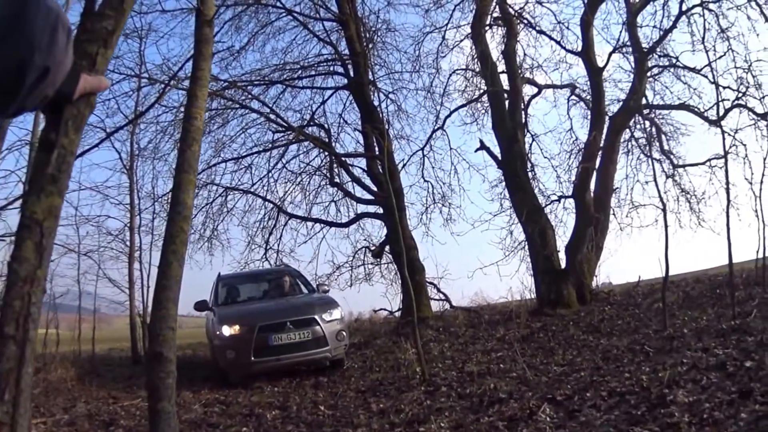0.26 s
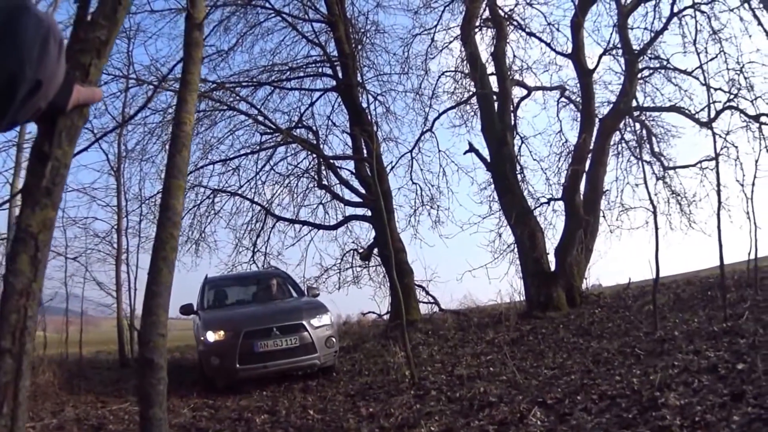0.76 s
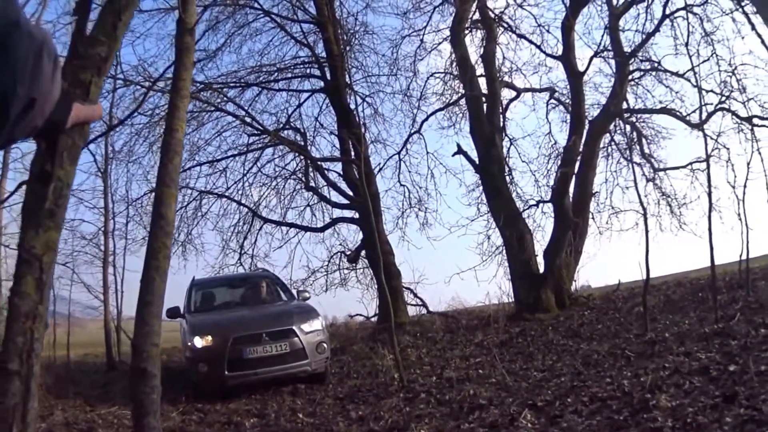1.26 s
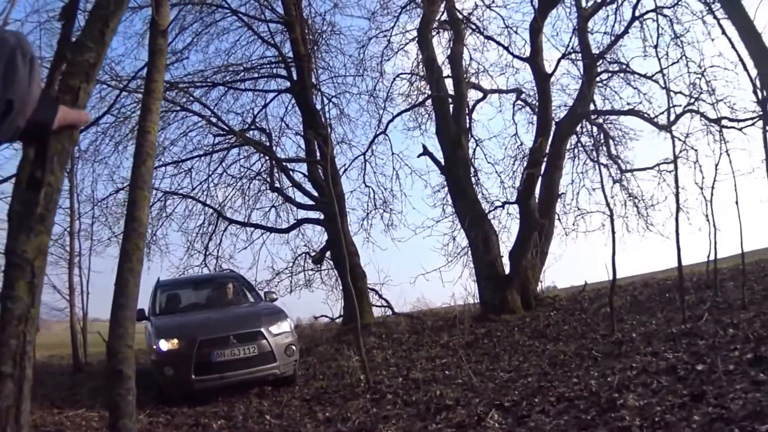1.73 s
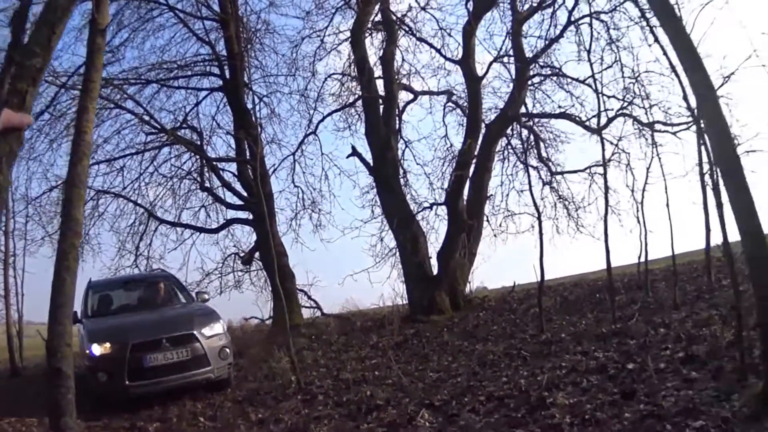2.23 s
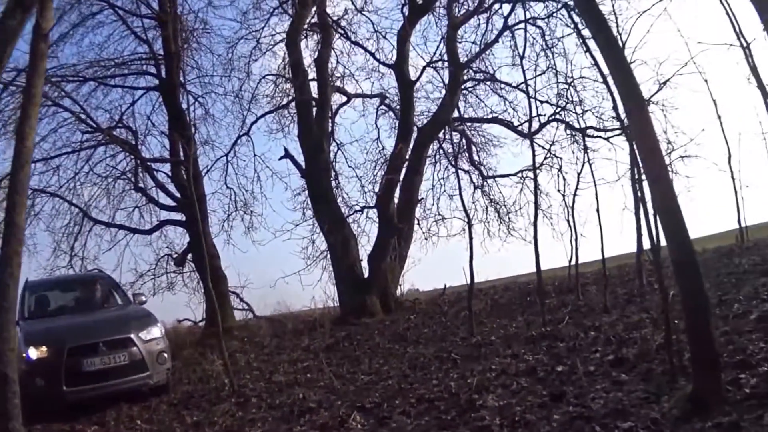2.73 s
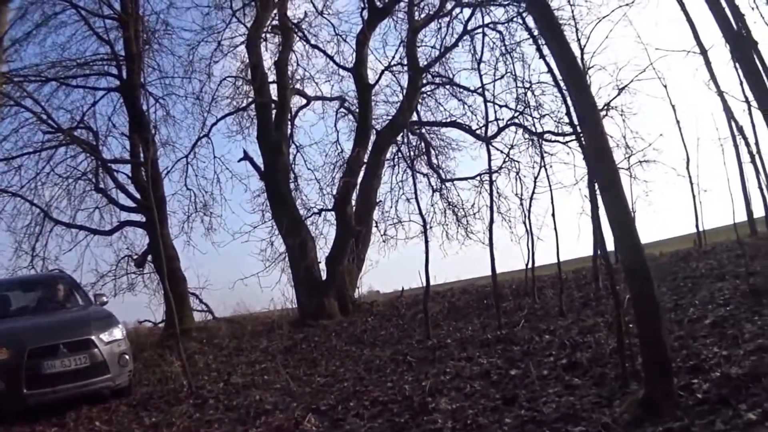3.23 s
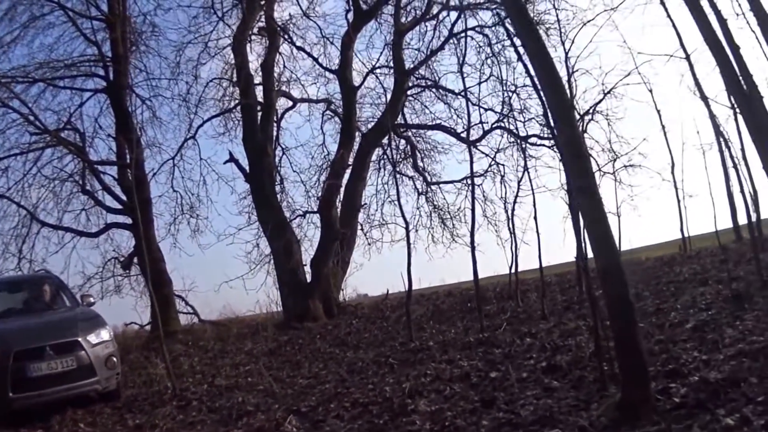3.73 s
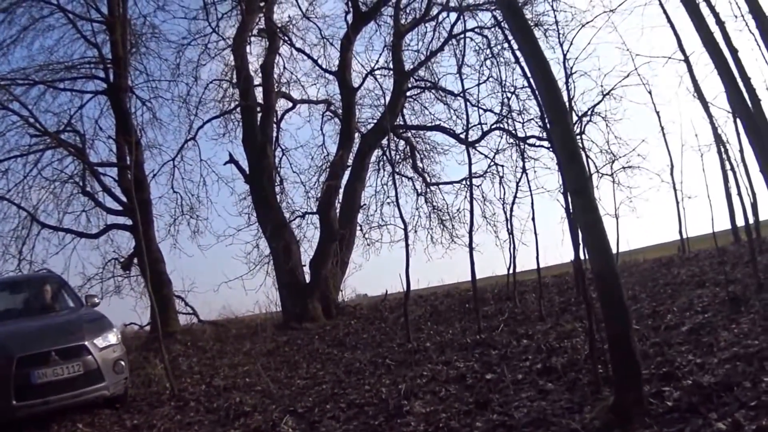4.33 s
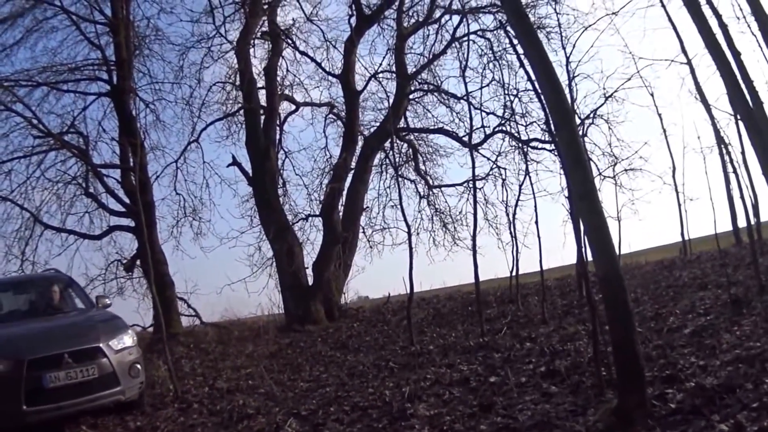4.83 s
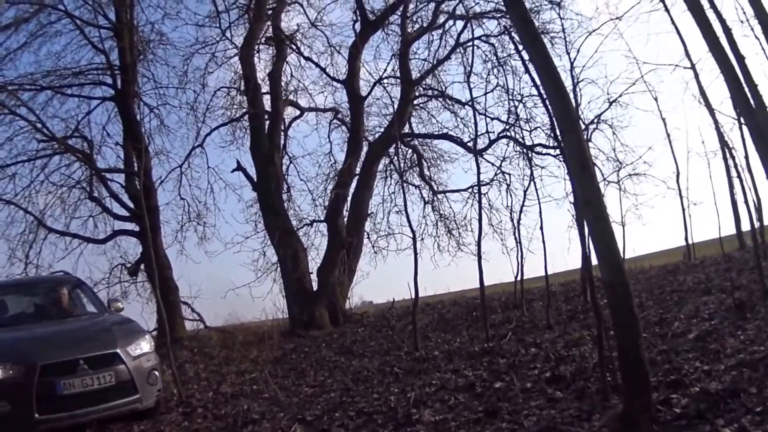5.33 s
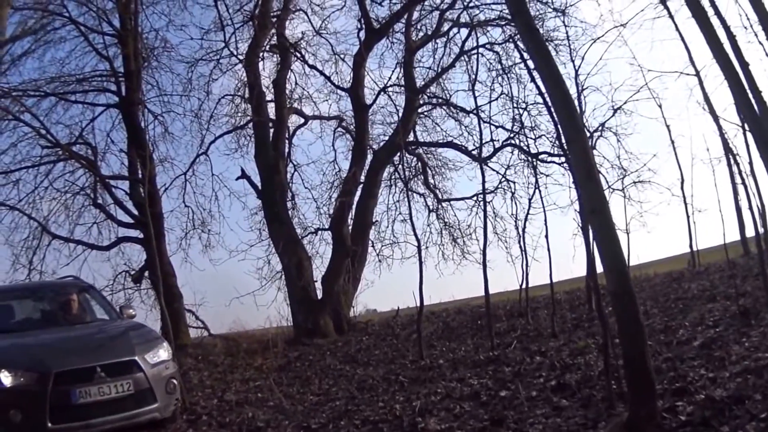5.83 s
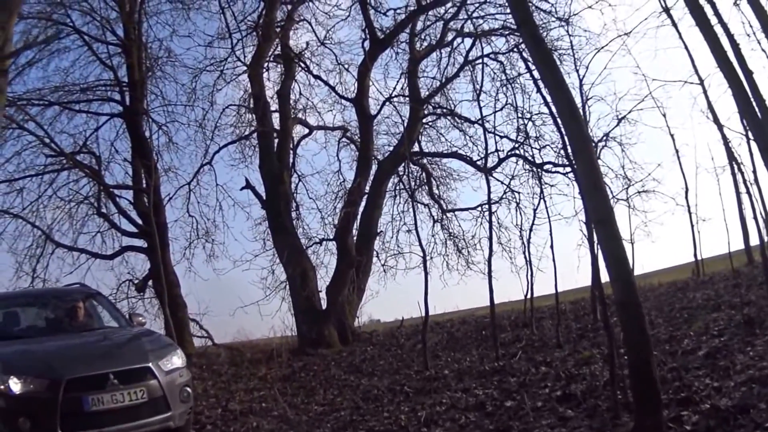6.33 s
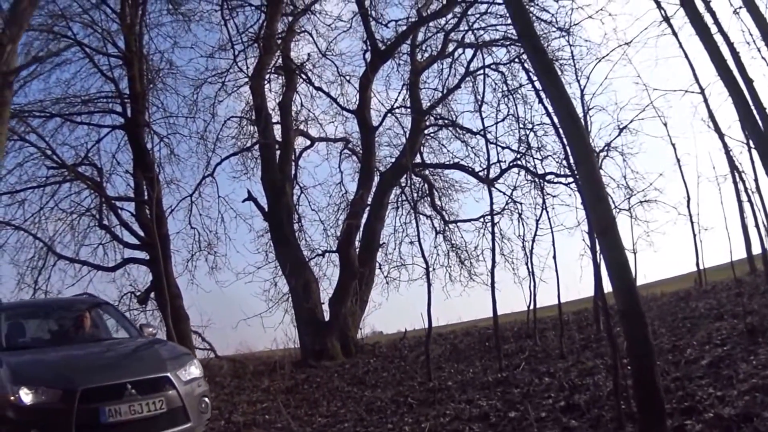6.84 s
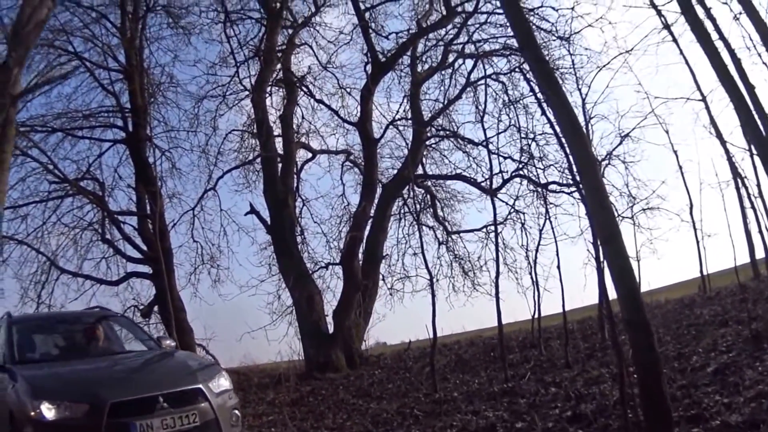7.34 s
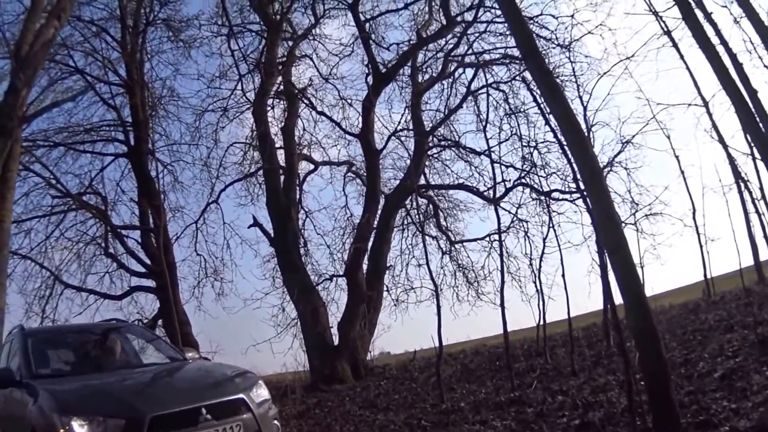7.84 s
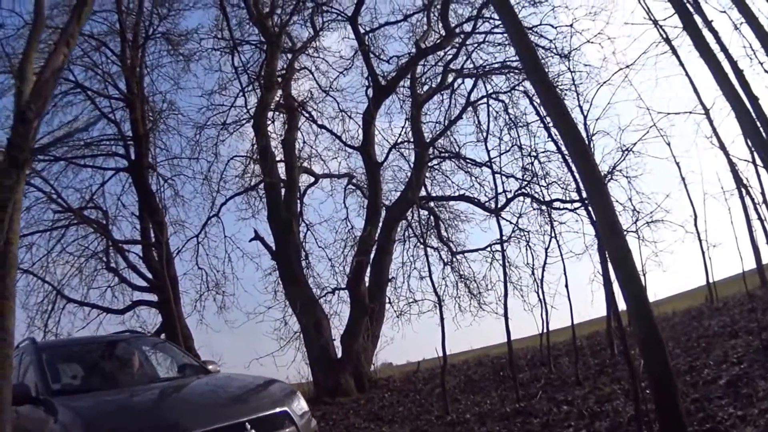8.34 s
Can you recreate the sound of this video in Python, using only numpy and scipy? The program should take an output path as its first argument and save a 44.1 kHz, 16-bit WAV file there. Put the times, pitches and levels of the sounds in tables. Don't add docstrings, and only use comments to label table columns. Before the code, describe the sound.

In open woodland, a small hand-held stereo camera hears a diesel off-road car creeping closer. From 0 s the engine clatters and hums, slowing slightly towards 1 s, while tyres crackle continuously over dry leaves and twigs snap irregularly. At about 0.6 s a thick stick breaks sharply. Around 0.6 to 1.9 s a sleeve brushes roughly on bark, with soft low finger bumps and small wooden knocks. At 1.57 s a branch hits the underbody, a dull, briefly ringing thump with a short scrape. The engine picks up from 2 s, peaking near 3.2 s with a deep leaf crunch, then eases. Scattered snaps and handling thuds follow, clustered around 4 s. It revs again at 6.2 s, then slows to a knocking idle-like crawl by 7.75 s. Leaf crunching thickens after 7 s, and very loud twig cracks burst at 8.1 s before engine and leaves continue to 8.6 s.

```python
import sys
import numpy as np
from scipy import signal
from scipy.fft import rfft, irfft, next_fast_len
from scipy.io import wavfile

SR = 44100
rng = np.random.default_rng(int(sys.argv[2]) if len(sys.argv) > 2 else 0)


def dump(signal):
    limited = np.clip(np.atleast_2d(signal).T, -1, 1)
    pcm = np.round(limited * 32767).astype(np.int16)
    wavfile.write(sys.argv[1], SR, pcm)


def field_ratio(decibels):
    return 10 ** (np.asarray(decibels, dtype=float) / 20)


N = 378378

# time in seconds, firings per second.
FIRING_RATE = [(0.0, 30.5), (1.0, 24.8), (1.7, 25.6), (2.25, 33.3), (2.8, 33.8), (3.09, 40.6), (3.27, 41.2),
               (3.54, 37.8), (4.08, 33.6), (4.5, 35.35), (5.83, 30.6), (6.17, 39.6), (6.32, 39.4),
               (6.55, 35.9), (7.3, 29.9), (7.75, 24.4), (8.0, 25.5), (8.58, 26.0)]
# time in seconds, level in dB.
ENGINE_LOAD = [(0.0, -44.5), (1.6, -46), (1.77, -43), (2.39, -42.5), (2.82, -39.5), (3.32, -34),
               (3.61, -36.5), (5.52, -40.5), (5.95, -37.5), (6.09, -34.5), (6.88, -36), (7.12, -38),
               (8.58, -39.5)]
# frequency in Hz, level in dB per Hz.
CLATTER_SPECTRUM = [(700, -36.5), (1100, -25.5), (1500, -11), (2000, 1), (2600, -4), (3500, -3.5),
                    (6000, -9), (11000, -17)]
# frequency in Hz, width in Hz, gain in dB.
BLOCK_RESONANCES = [(1239, 184, 15.5), (1817, 89, 9.5), (2277, 360, 6), (2600, 50, 0)]
# frequency in Hz, level in dB per Hz.
RUMBLE_SPECTRUM = [(20, -7), (32, -8), (59, -8), (113, -7), (200, -6.5), (330, -3.5), (450, -11),
                   (900, -23.5)]
# frequency in Hz, level in dB per Hz.
DRONE_SPECTRUM = [(250, -27), (400, -7.5), (560, -7), (940, -10), (1100, -1.5), (1430, -5), (2400, -64)]
# multiple of the firing rate, level in dB.
HUM_PARTIALS = [(1, -74.5), (2, -68.5), (3, -69), (4, -69), (5, -71), (6, -68.5), (7, -74.5), (8, -71),
                (9, -73.5), (10, -71.5), (11, -82), (12, -78), (13, -78)]
# frequency in Hz, width in Hz, gain in dB.
TAILPIPE_RESONANCES = [(41.1, 11, 15.5), (52, 8.5, 6), (78.6, 7.3, 6.5), (120, 17, 1.5), (235.6, 23, 6.5),
                       (293, 14, 2), (459, 23, 9.5)]
# frequency in Hz, width in Hz, gain in dB.
PIPE_RESONANCES = [(239, 16, 9.5), (308, 130, 3.5), (466.3, 42, 16), (659, 160, 6.5)]
# frequency in Hz, width in Hz, level in dB.
PIPE_BOOMS = [(240.3, 9.6, -72), (299.4, 11, -74.5), (470.4, 16, -69), (629, 22, -71), (660, 4.9, -75)]
# time in seconds, level in dB.
ROLLING = [(0.0, -45.5), (0.48, -49), (1.05, -45), (1.36, -48.5), (1.72, -50.5), (1.98, -48), (2.89, -48),
           (3.1, -47.5), (3.6, -47), (4.59, -46), (5.61, -45), (6.09, -48), (6.8, -44.5), (7.2, -45),
           (7.65, -45), (8.05, -43.5), (8.36, -44.5), (8.58, -44.5)]
# time in seconds, half length in seconds, extra level in dB.
LEAF_SURGES = [
    (0.646, 0.065, 1.5),
    (3.312, 0.12, 4),
    (4.375, .1, 1.5),
    (5.022, .1, 1.5),
    (5.645, 0.075, 1),
    (7.014, 0.058, 1.5),
    (7.365, 0.055, 4),
    (7.78, 0.031, 0.5),
    (8.058, .14, 2.5),
]
# frequency in Hz, level in dB per Hz.
CRUSH_SPECTRUM = [(900, -39), (1600, -3), (2500, -2), (4000, -1.5), (6000, 1), (8500, 0.5), (11000, -0.5)]
# start in seconds, peak in dB, brittleness in dB, pitch in Hz.
TWIG_SNAPS = [(0.0445, -19.5, -8, 3630), (0.0907, -21.5, -20, 3750), (0.2685, -21, -14.5, 5390),
              (0.5428, -20, -13, 5360), (0.591, -26, -14, 7000), (0.684, -17, -19, 5470),
              (0.7897, -22, -27, 4650), (0.819, -23, -21, 4590), (0.8944, -28, -16, 3670),
              (0.9393, -25, -20, 5260), (1.004, -24, -35, 4440), (1.0535, -27, -18, 5260),
              (1.0976, -23, -14, 5020), (1.2974, -27, -22, 6050), (1.516, -22, -8, 6400),
              (1.5377, -23, -12, 5430), (1.5728, -25, -14, 5500), (1.6216, -25, -32, 6010),
              (2.362, -29, -27, 4940), (2.392, -24, -24, 6050), (3.121, -23, -26, 5150),
              (3.315, -22, -51, 6200), (3.386, -20, -8, 5200), (3.4895, -27, -25, 4050),
              (3.521, -23.5, -26, 4140), (3.6476, -21, -8, 6360), (3.7304, -26, -25, 4160),
              (4.0118, -37, -32, 3300), (4.181, -20.5, -26, 5060), (4.4625, -23, -25, 6200),
              (4.6523, -22, -27, 3910), (4.9645, -19, -10, 4180), (5.1447, -25, -25, 5040),
              (5.3697, -24.5, -14, 5150), (5.462, -24, -20, 4920), (5.6171, -21.5, -14, 5000),
              (5.945, -27, -21, 6060), (7.1546, -24, -20, 4270), (7.315, -17, -10, 4120),
              (7.4725, -21, -12, 5220), (7.5012, -21, -22, 4600), (7.64, -23, -30, 6200),
              (7.722, -19, -11, 4930), (7.7697, -24, -32.5, 4320), (7.7947, -21, -13, 5250),
              (7.8057, -23, -17, 5140), (7.9885, -19, -17, 4250), (8.111, -17.5, -17, 5500),
              (8.1344, -4.5, -16, 5400), (8.186, -9, -14, 7200)]
# start in seconds, peak in dB, pitch in Hz.
STEM_CRACKS = [(0.167, -30, 3730), (1.4979, -29, 5220), (1.694, -34, 5280), (2.8029, -32, 5150),
               (3.0744, -34, 4290), (3.0914, -33, 6050), (3.2194, -31, 4020), (3.2464, -28, 3560),
               (3.2754, -29, 5010), (3.2974, -26, 4180), (3.3494, -28, 4180), (3.4194, -29, 4160),
               (4.1668, -26, 4060), (5.0, -27, 5270), (5.5029, -31, 5310), (6.0596, -32, 4910),
               (6.9594, -26, 4200), (7.0294, -25, 5120), (7.0694, -32, 5040), (7.3354, -25, 5990),
               (7.3694, -22, 4160), (7.3944, -25, 6250), (7.6001, -30, 6130), (7.7493, -24, 4270),
               (7.9294, -26, 5120), (8.0004, -23, 5140), (8.0444, -24, 5210), (8.0904, -20, 6050),
               (8.1164, -25, 7010), (8.1204, -12, 5290), (8.1454, -21, 10500), (8.1994, -22, 5140),
               (8.2444, -26, 5320)]
# time in seconds, peak in dB, pitch in Hz.
HAND_THUDS = [(0.544, -44, 139), (0.736, -38.5, 120), (1.099, -39, 128), (1.152, -46, 115),
              (1.2, -40.5, 128), (1.239, -52, 125), (1.289, -48, 132), (1.395, -49, 74), (1.44, -40, 123),
              (1.488, -44, 124), (1.515, -40, 111), (1.55, -43, 185), (1.823, -45.5, 144), (1.98, -43, 172),
              (2.004, -43, 105), (2.061, -46, 136), (2.128, -46.2, 167), (2.148, -42.5, 133),
              (2.281, -42, 151), (2.503, -45, 187), (2.766, -42.5, 167), (3.784, -36, 158),
              (3.909, -42.5, 186), (4.005, -41, 119), (4.034, -52, 145), (4.054, -42, 182),
              (4.112, -35.5, 127), (4.184, -45, 173), (4.207, -39, 136), (4.247, -44, 123),
              (4.447, -44, 154), (4.797, -42.5, 120), (4.832, -41.5, 133), (4.87, -68, 171),
              (5.112, -45, 133), (5.192, -40, 107), (5.987, -43, 186), (6.501, -42, 116), (6.533, -37, 132),
              (6.551, -40.5, 138), (6.573, -45.2, 143), (6.596, -47, 88), (6.619, -56, 161),
              (6.929, -37, 141), (7.391, -40.5, 165), (7.633, -41, 143), (7.693, -42, 121),
              (7.791, -41, 143), (7.824, -40, 132), (7.875, -41, 187), (7.904, -48, 154), (8.024, -44, 133),
              (8.056, -42, 111), (8.142, -47, 97), (8.191, -42, 122), (8.216, -44, 129), (8.254, -45, 134),
              (8.409, -46, 109)]
# frequency in Hz, width in Hz, level in dB.
STICK_RESONANCES = [(2020, 620, -3), (3100, 700, -12), (4570, 660, 5), (5400, 500, -2), (7030, 640, 0),
                    (8300, 1100, 3), (10200, 550, 1.5)]
# start in seconds, peak in dB, tick in dB.
WOOD_KNOCKS = [(.766, -35, -17), (1.004, -31.5, -3), (1.217, -37, -27), (1.5386, -50, 15.5),
               (1.574, -54, 19), (1.6243, -49, 11), (1.73, -51, 4), (7.638, -54, 15.5), (8.051, -35, -14),
               (3.907, -31, 0), (7.875, -30.5, -9)]
# frequency in Hz, level in dB, time to fall 60 dB in seconds.
UNDERBODY_RINGING = [(207, -4, 0.58), (237.6, 4, 0.37), (317, 5, 0.32), (360, 17.5, 0.053),
                     (410, 1.5, 0.82), (460, 9.5, 0.089), (489, 4, 0.19), (563, 4, 0.2), (640, -1, 0.23),
                     (700, -22, 0.27)]
# time in seconds, left minus right in dB, plus 1.5 dB.
CAR_PAN = [(0.0, 0.5), (1.55, 0), (2.41, 1.5), (4.35, 2), (5.14, 1.5), (6.76, 2), (8.1, 1), (8.58, 1)]
# frequency in Hz, width in Hz, gain in dB.
LEFT_HOUSING = [(2350, 500, 3), (3400, 370, -5.8), (3820, 180, -5.1), (4520, 550, -4.2), (5520, 470, -9.7),
                (6500, 380, -9.9), (7940, 600, -12.7), (9600, 970, -13.2)]
# frequency in Hz, width in Hz, gain in dB.
RIGHT_HOUSING = [(3320, 630, -6.0), (3910, 120, -2.8), (4490, 390, -7.9), (5930, 750, -3.8),
                 (7670, 800, -12.0), (8870, 590, -6.9), (9540, 690, -10.9)]
# frequency in Hz, width in Hz, gain in dB.
SHARED_CAVITY = [(3450, 200, -1.2), (4150, 150, 2.2), (4820, 220, -1.2), (5180, 200, .8), (5720, 260, -1.4),
                 (6030, 200, 1.8), (6670, 320, -3.5)]
# frequency in Hz, gain in dB.
TREBLE_CUT = [(10990, 0), (11040, -27), (11300, -47), (12000, -65), (13000, -80)]

TIME = np.arange(N) / SR


def rms_one(x):
    return x / np.sqrt(np.mean(x ** 2) + 1e-20)


def peak_one(x):
    return x / np.abs(x).max()


def in_time(rows):
    s, value = np.transpose(rows)
    return np.interp(TIME, s, value)


def drift(rate):
    r = np.exp(-80 * np.pi * rate / SR)
    slow = signal.lfilter([1], [1, -2 * r, r * r], rng.standard_normal(N // 40 + 2002))[2000:]
    return np.interp(np.arange(N) / 40, np.arange(len(slow)), rms_one(slow))


def colour(x, points):
    point_hz, point_db = np.transpose(points)
    hz = np.maximum(np.arange(2049) * SR / 4096, 1)
    cepstrum = irfft(np.log(field_ratio(np.interp(np.log(hz), np.log(point_hz), point_db))))
    cepstrum[1:2048] *= 2
    cepstrum[2049:] = 0
    impulse = irfft(np.exp(rfft(cepstrum)))
    return signal.oaconvolve(x, np.atleast_2d(impulse), axes=-1)[:, :N]


def peaks(x, modes):
    for hz, width_hz, gain_db in modes:
        a, w, half = field_ratio(gain_db / 2), 2 * np.pi * hz / SR, np.pi * width_hz / SR
        middle = -2 * np.cos(w)
        x = signal.lfilter([1 + half * a, middle, 1 - half * a], [1 + half / a, middle, 1 - half / a], x)
    return x


def band(x, low_hz, high_hz):
    return signal.sosfilt(signal.butter(2, [low_hz, high_hz], "band", fs=SR, output="sos"), x)


def around(x, hz, width_hz):
    return rms_one(band(x, hz - width_hz / 2, hz + width_hz / 2))


def add(out, s, sound):
    at = round(s * SR)
    out[..., at:at + sound.shape[-1]] += sound[..., :N - at]


def spread(direct, scattered, share):
    share = np.clip(share, 0, 1)
    return np.sqrt(1 - share) * direct + np.sqrt(share) * scattered


def crankshaft(rate):
    turns = np.cumsum(rate * (1 + 0.004 * drift(6.6))) / SR
    firing = turns.astype(int)
    cylinder_db = np.array([-1.06, -1.3, -0.97, -1.0])
    strength_db = cylinder_db[firing % 4] + 0.48 * rng.standard_normal(400)[firing]
    return turns, firing, strength_db


def block_clatter(gate, white):
    knocking = gate * spread(white[0], white[1:3], 0.082)
    return rms_one(peaks(colour(knocking, CLATTER_SPECTRUM), BLOCK_RESONANCES))


def exhaust_hum(turns):
    hum = sum(field_ratio(db + 3.5 * drift(4)) * np.sin(2 * np.pi * k * turns + k * k) for k, db in HUM_PARTIALS)
    return peaks(hum, TAILPIPE_RESONANCES)


def pipe_booms(excitation):
    return sum(field_ratio(db + 1.0 * drift(0.93)) * around(excitation, hz, width_hz) for hz, width_hz, db in PIPE_BOOMS)


def engine():
    rate = in_time(FIRING_RATE)
    clatter_db = in_time(ENGINE_LOAD)
    swing_db = clatter_db + 40
    faster = rate - 32
    drone_db = -64.5 + 0.3 * TIME + 0.045 * swing_db
    rumble_db = -60 + 0.56 * swing_db + 2.0 * drift(0.9)
    hum_db = -1 + 0.15 * faster
    knock_db = 3 - 0.41 * faster
    turns, firing, strength_db = crankshaft(rate)
    gate = field_ratio(knock_db * (1 - 2 * (turns % 1) ** 1.5) + strength_db + 0.66 * drift(34))
    white = rng.standard_normal((9, N))
    clatter = block_clatter(gate, white)
    rumble = rms_one(colour(gate ** 1.3 * spread(white[3], white[4:6], 0.37), RUMBLE_SPECTRUM))
    puffs = rms_one(np.diff(firing, prepend=0) * field_ratio(strength_db))
    body = 0.25 * puffs + gate ** 0.19 * spread(white[6], white[7:], 0.49)
    drone = rms_one(colour(body, DRONE_SPECTRUM))
    opposed = rms_one(band(white[1], 300, 2460)) * [[1], [-1]]
    plain = field_ratio(rumble_db) * rumble + field_ratio(drone_db + 2.0) * drone
    near = np.clip((drone_db + 64.0) / 2.39, .2, 1.7)
    exhaust = plain + near * (peaks(plain, PIPE_RESONANCES) - plain) + field_ratio(hum_db) * exhaust_hum(turns)
    booms = near * field_ratio(swing_db) * pipe_booms(white[3] + 0.24 * puffs)
    return field_ratio(clatter_db + 1.0) * clatter + exhaust + booms + field_ratio(drone_db + 6.5) * opposed


def grains(per_s, size_db, channels):
    sizes = field_ratio(size_db * np.minimum(rng.exponential(1, (channels, N)), 5))
    sizes = sizes * rng.choice([-1, 1], (channels, N))
    return rms_one(sizes * (rng.random((channels, N)) < per_s / SR))


def leaves():
    crush_db = in_time(ROLLING)
    for s, half_s, db in LEAF_SURGES:
        crush_db = crush_db + db * np.exp(-((TIME - s) / half_s) ** 2)
    bright_db = -1 + crush_db - crush_db.mean()
    clump = field_ratio(0.7 * drift(25) + 1.5 * drift(70))
    under_tread = grains(9000 * clump, 3.6, channels=1)
    scattered = grains(14000 * clump, 0.71, channels=2)
    crackle = spread(under_tread, scattered, 0.23)
    crackle = rms_one(colour(crackle * np.sqrt(clump), CRUSH_SPECTRUM))
    dull = signal.lfilter(*signal.butter(1, 7000, fs=SR), crackle)
    return field_ratio(crush_db + 12.5) * (dull + field_ratio(bright_db) * (crackle - dull))


def twigs():
    out, t = np.zeros((2, N)), np.arange(1400) / SR
    for s, peak_db, brittle_db, hz in TWIG_SNAPS:
        white = rng.standard_normal((3, len(t)))
        crumble_s = .0005 - .00004 * peak_db
        fade = np.exp(-t / crumble_s) + .06 * np.exp(-t / .01)
        burst = spread(white[0], white[1:], .1) * np.minimum(t / .0006, 1) * fade
        burst[:, round(.0007 * SR)] += 2.5
        splinter = rms_one(band(burst, 0.85 * hz, 1.2 * hz)) + 0.7 * rms_one(band(burst, 3900, 7500))
        wood = rms_one(band(band(burst, 1670, 2700), 1670, 2700))
        crisp = rms_one(band(burst, 6600, 10700))
        snap = splinter + field_ratio(-15) * wood + field_ratio(brittle_db + 25.5) * crisp
        add(out, s, field_ratio(1.12 * peak_db + 5.5) * peak_one(snap))
    return out


def cracks():
    out, t = np.zeros((2, N)), np.arange(900) / SR
    for s, peak_db, hz in STEM_CRACKS:
        white = rng.standard_normal((3, len(t)))
        burst = spread(white[0], white[1:], .1) * np.exp(-t / .0006)
        pitched = rms_one(band(burst, .85 * hz, min(1.15 * hz, 11500)))
        crack = pitched + .6 * rms_one(band(burst, 3000, 11000))
        add(out, s, field_ratio(peak_db + 2.5) * peak_one(crack))
    return out


def sleeve():
    stroke = np.exp(-((TIME - 1.23) / 0.65) ** 4)
    return field_ratio(-62.5 + 3.6 * drift(20)) * stroke * rms_one(band(rng.standard_normal(N), 720, 1700))


def hand():
    thuds, grip, t = np.zeros(N), np.zeros(N), np.arange(-700, 700) / SR
    for s, peak_db, hz in HAND_THUDS:
        lean = rng.uniform(0, 2 * np.pi)
        cycles = 1.03 * hz * t
        falling = 0.8 * cycles - 0.64 * cycles ** 2
        thud = np.cos(2 * np.pi * falling + lean) * np.exp(-(cycles / 0.5) ** 2)
        add(thuds, s - 700 / SR, field_ratio(peak_db + 1.5) * thud)
        grip += field_ratio(peak_db - 27) * np.exp(-((TIME - s) / 0.084) ** 2)
    rub = grip * field_ratio(3.2 * drift(33)) * rms_one(band(rng.standard_normal(N), 40, 310))
    return band(thuds, 44, 440) + rub


def thick_stick():
    out, t = np.zeros((2, N)), np.arange(900) / SR
    white = rng.standard_normal((3, len(t)))
    fade = np.exp(-t / .0008) + 0.025 * np.exp(-t / 0.006)
    burst = spread(white[0], white[1:], 0.056) * np.minimum(t / .001, 1) ** 2 * fade
    stick = sum(field_ratio(db) * around(burst, hz, width_hz) for hz, width_hz, db in STICK_RESONANCES)
    add(out, .6168, field_ratio(-1.5) * peak_one(stick))
    return out


def knocks():
    out, t = np.zeros(N), np.arange(900) / SR
    for s, peak_db, tick_db in WOOD_KNOCKS:
        push = band(np.exp(-t / 0.00014), 300, 1770)
        tick = rng.standard_normal(len(t)) * (np.exp(-t / .0004) + .15 * np.exp(-t / .005))
        tick = band(band(tick, 1250, 2900), 1250, 2900)
        add(out, s, field_ratio(peak_db) * (peak_one(push) + field_ratio(tick_db + 11) * peak_one(tick)))
    return out


def branch():
    out, t, start_s = np.zeros(N), np.arange(12000) / SR, 1.573
    ringing = sum(field_ratio(db - 60 * t / t60) * np.sin(2 * np.pi * hz * t) for hz, db, t60 in UNDERBODY_RINGING)
    damped = np.exp(-t / 0.0053) + 0.12
    rise = np.sin(np.pi / 2 * np.minimum(t / 0.0034, 1)) ** 2
    add(out, start_s, field_ratio(-34.5) * band(ringing * damped * rise, 130, 3000))
    scrape = rms_one(band(rng.standard_normal(len(t)), 167, 450))
    scrape = scrape * np.exp(-t / 0.1) * np.minimum(t / 0.0022, 1)
    add(out, start_s, field_ratio(-48) * band(scrape, 170, 800))
    return out


def scene():
    pan_db = in_time(CAR_PAN) - 1.5
    car = (engine() + leaves()) * field_ratio(pan_db * [[.5], [-.5]])
    return car + twigs() + cracks() + sleeve() + hand() + thick_stick() + knocks() + branch()


def roll_off(x):
    return signal.sosfilt(signal.butter(12, 12330, fs=SR, output="sos"), x)


def record(dry):
    size = next_fast_len(N)
    hz = np.arange(size // 2 + 1) * SR / size
    lag_rad = 1.3 * (1 + np.tanh((hz - 6500) / 200)) / 2
    late = irfft(rfft(dry[1], size) * np.exp(-1j * lag_rad), size)[:N]
    ports = np.array([peaks(dry[0], LEFT_HOUSING), peaks(late, RIGHT_HOUSING)])
    return roll_off(colour(peaks(ports, SHARED_CAVITY), TREBLE_CUT))


dry = scene()
out = record(dry)
dump(out)
```